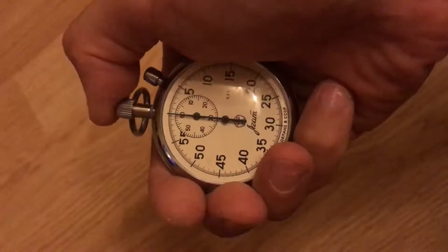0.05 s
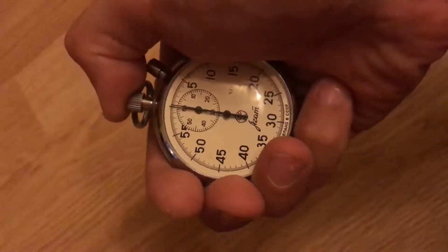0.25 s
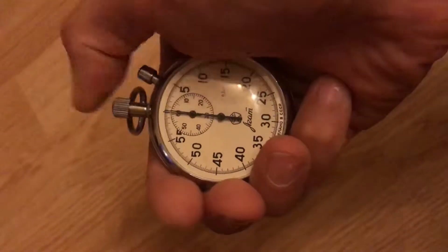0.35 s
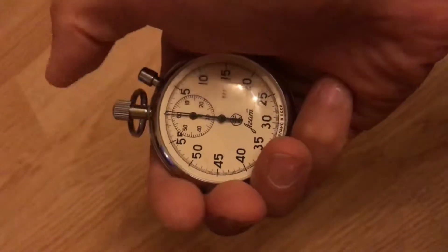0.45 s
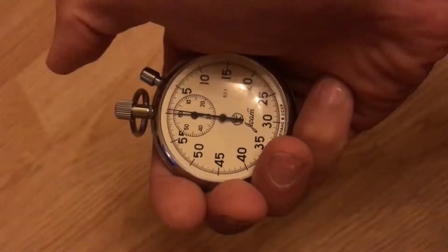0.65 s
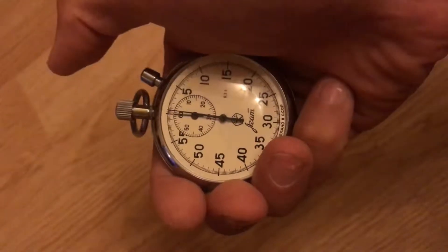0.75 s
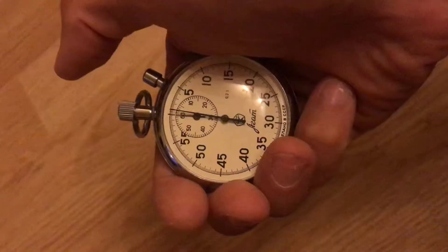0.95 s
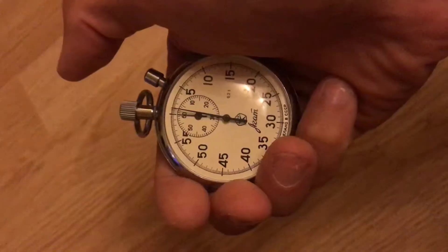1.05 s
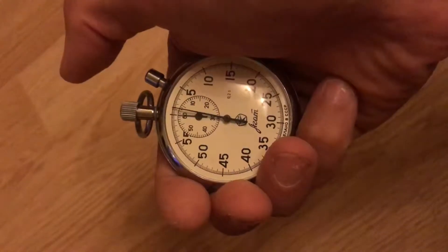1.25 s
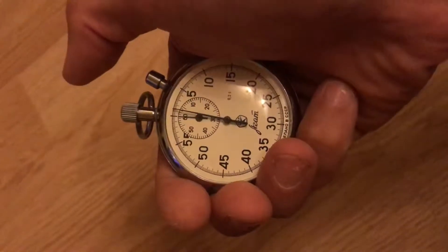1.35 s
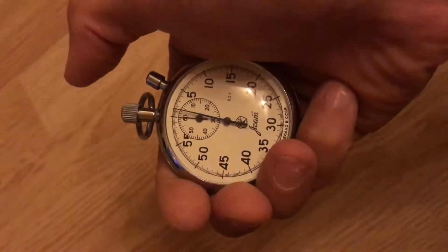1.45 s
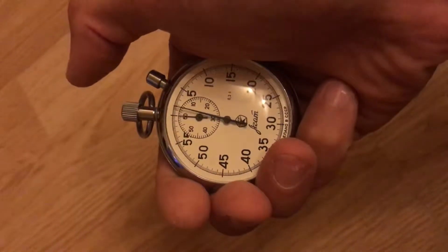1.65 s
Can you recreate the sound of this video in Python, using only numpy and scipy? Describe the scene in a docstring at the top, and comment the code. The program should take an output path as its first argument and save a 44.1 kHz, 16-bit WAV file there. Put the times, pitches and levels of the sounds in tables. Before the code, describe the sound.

A mechanical stopwatch is started close up in a small room. Tiny lever catches creak from about 0.15 seconds, and the crown snaps down with a sharp metallic click at 0.25. It springs back at 0.4 with a second click, a short rattle and a faint ring. From 0.5 to 1.5 seconds it ticks faintly, five times a second, over low hum, rumble and hiss.

```python
"""A mechanical stopwatch, started by a thumb and heard close up in a small room.
The levers creak and catch, the crown snaps down, then springs back with a short rattle.
Each contact rings the steel case and shakes the works; the two big clicks set a spring singing.
The escapement then ticks faintly five times a second over a bed of low hum, rumble and hiss."""
import sys
import numpy as np
from scipy import signal
from scipy.fft import rfft, irfft
from scipy.io import wavfile

SR = 44100
rng = np.random.default_rng(int(sys.argv[2]) if len(sys.argv) > 2 else 0)


def generate_wav(signal):
    """Clip the signal to [-1, 1] and save it as 16-bit WAV at the path in sys.argv[1]."""
    frames = np.transpose(np.atleast_2d(signal))
    scaled = np.clip(frames, -1, 1) * 32767
    pcm = np.round(scaled).astype(np.int16)
    wavfile.write(sys.argv[1], SR, pcm)


N = 74970
T = np.arange(N) / SR

# Levers catching as the crown travels. Each row: start in seconds, strength in dB, pawl ping in dB.
LEVER_CATCHES = [(0.135, -24.5, -75), (0.1533, -7.5, -45.5), (0.1564, 3, -32), (0.177, -4, -28),
                 (0.2034, -8, -54.5), (.2051, 0.5, -35), (0.2055, -3, -51.5), (.2275, -6.5, -53.5),
                 (.2330, 4, -35.5), (0.2495, 0, -27.5), (.3757, -12.5, -57), (.3834, 2, -37.5),
                 (0.3965, 1.5, -45), (0.3991, 5, -42)]
# The crown snaps home, then springs back and bounces. Each row: start in seconds, strength in dB.
CROWN_PRESS = [(.2349, 0), (.2354, 1)]
CROWN_RELEASE = [(0.4042, 2.5), (.4062, -0.5), (0.4124, -7.5)]
# Blunt knocks of the case, on press and on release.
# Each row: start in seconds, strength in dB, low and high band edges in Hz.
CASE_KNOCKS = [(.2354, 10.5, 90, 3623), (0.4129, -0.5, 1524, 2700)]
# Escapement beats, and tiny high pings between them. Each row: start in seconds, strength in dB.
BEATS = [(.516, -1), (0.7171, 1), (0.9155, -0.5), (1.1171, 0), (1.3158, -1), (1.5174, 2)]
HIGH_PINGS = [(1.023, -44.5), (1.229, -46), (1.330, -39), (1.4325, -44), (1.5347, -43.5), (1.637, -44.5)]
# Modes of the steel case. Each row: pitch in Hz, ring time (t60) in seconds,
# then gain in dB when struck by a press, a release, a catch and a tick.
CASE_MODES = [(2040, .03, -42, -33.5, -46, -68.5), (2193.4, 0.031, -27.5, -40.5, -53, -75.5),
              (2860, .035, -43, -39.5, -47.5, -61.5), (3610, .018, -23.5, -49.5, -51, -66),
              (4345, .018, -29, -38.5, -56, -93), (5158, 0.027, -34, -26.5, -43.5, -57),
              (5288, 0.028, -26.5, -31, -46, -61.5), (7080, 0.025, -28, -27, -57, -66),
              (8544, .022, -33, -28, -53.5, -62), (9000, .015, -30, -35, -46, -57),
              (10190, 0.02, -25, -27, -55.5, -64), (9960, .03, -24.5, -37.5, -54, -62),
              (12550, 0.02, -23.5, -42, -57, -95), (14050, .012, -25, -36.5, -56.5, -75.5),
              (15180, .018, -23, -38.5, -57, -61.5), (16140, 0.017, -19.5, -42.5, -58.5, -72.5)]
PRESS_MODE_DB, RELEASE_MODE_DB, CATCH_MODE_DB, TICK_MODE_DB = np.transpose(CASE_MODES)[2:]
# Partials of the spring. Each row: pitch in Hz, ring time (t60) in seconds, gain in dB.
SPRING_MODES = [(2198, 0.13, -53), (5110, .45, -54), (5240, .35, -51), (5345, .35, -49.5),
                (10240, .15, -54.5)]
# Tone of the works' dense, short clatter for each kind of hit. Each row: frequency in Hz, gain in dB.
CATCH_CLATTER_EQ = [(100, -44), (1400, -35), (2100, -15.5), (2800, -12.5), (4500, -20.5), (5300, -20),
                    (6800, -25), (9300, -18), (11000, -25.5), (16000, -26.5)]
PRESS_CLATTER_EQ = [(100, -7), (1200, -10.5), (2400, -3.5), (4200, 2), (6200, 1.5), (7800, -0.5),
                    (9300, 10), (11000, 0), (12300, 3.5), (16000, 3)]
RELEASE_CLATTER_EQ = [(100, -28.5), (900, -33), (1500, -8), (2500, 5), (3400, -3.5), (4300, 0), (5900, -2),
                      (7800, -7), (9300, 6), (11700, 1), (13500, -7), (16000, -8)]
TICK_CLATTER_EQ = [(100, -48), (1800, -46), (3000, -33), (4400, -58), (5300, -22), (6400, -45.5),
                   (9500, -28), (11000, -34.5), (16000, -38)]
# Tone of the room's tail, the rumble and the hiss. Each row: frequency in Hz, gain in dB.
ROOM_EQ = [(100, -40.5), (1000, -35), (1500, -26), (2000, -17), (3000, -20), (5200, -17), (7000, -18),
           (10000, -21), (11500, -18.5), (13500, -16), (15500, -22.5)]
RUMBLE_EQ = [(20, -68), (35, -55), (48, -43.5), (66, -44.5), (110, -39.5), (160, -47.5), (220, -44.5),
             (450, -57.5), (750, -56), (1020, -53.5), (1700, -62), (2300, -67.5), (4500, -79),
             (16000, -100)]
HISS_EQ = [(100, -57.5), (300, -60), (700, -67.5), (1500, -69), (3500, -70), (6000, -72), (8000, -75),
           (9300, -72.5), (10400, -79), (12000, -73), (15500, -76.5)]
# The hiss rides higher for a while after the snap. Each row: time in seconds, gain in dB.
HISS_FADER = [(0, 0), (.22, -1.5), (.25, 6), (.6, 10.5), (.805, 10), (.818, -1), (1.7, -1.5)]
# Mains hum, a low drone that swells, and the thud of the hand shifting as the thumb lifts.
# Each row: time in seconds, level in dB.
MAINS_FADER = [(0, -69), (.1, -60.5), (.58, -61), (.72, -80), (1.05, -57), (1.4, -57.5), (1.7, -64)]
DRONE_FADER = [(0, -67), (.68, -68.5), (.79, -59), (1.12, -58), (1.22, -63.5), (1.7, -69.5)]
THUD_FADER = [(.33, -95), (.368, -45), (0.389, -54), (.43, -62), (.52, -63.5), (.7, -80.5)]


def from_db(db):
    """Decibels to gain."""
    return 10 ** (np.asarray(db) / 20)


def fader(points):
    """A gain ride through (seconds, dB) points."""
    return from_db(np.interp(T, *np.transpose(points)))


def convolve(x, response):
    """Play x through an impulse response."""
    return signal.fftconvolve(x, response)[:N]


def equalise(x, points):
    """Minimum-phase EQ through (Hz, dB) points, so nothing rings ahead of a hit."""
    size = 4096
    hz, db = np.transpose(points)
    log_bin_hz = np.log(np.fft.rfftfreq(size, 1 / SR) + 1)
    gain = from_db(np.interp(log_bin_hz, np.log(hz), db))
    cepstrum = irfft(np.log(gain))
    cepstrum[1:size // 2] *= 2   # fold onto positive time
    cepstrum[size // 2 + 1:] = 0
    return convolve(x, irfft(np.exp(rfft(cepstrum))))


def band(x, low_hz, high_hz, order):
    """Butterworth band-pass."""
    sos = signal.butter(order, [low_hz, min(high_hz, .48 * SR)], "band", fs=SR, output="sos")
    return signal.sosfilt(sos, x + 1e-18)


def decay(t60):
    """An envelope that falls 60 dB in t60 seconds."""
    return np.exp(-np.log(1000) * T / t60)


def impulses(hits):
    """One impulse for each (seconds, dB) hit."""
    train = np.zeros(N)
    for start, db in hits:
        train[int(start * SR)] += from_db(db)
    return train


def hit_envelope(hits, t60):
    """Amplitude of a vibration that gains energy at each hit and dies away."""
    retained = np.exp(-2 * np.log(1000) / (t60 * SR))
    energy = signal.lfilter([1], [1, -retained], impulses(hits) ** 2 + 1e-24)
    return np.sqrt(energy)


def tone(hz):
    """A sine with a random starting phase."""
    return np.sin(2 * np.pi * (hz * T + rng.random()))


def ring(hits, hz, t60):
    """One mode, kept ringing by the hits."""
    return hit_envelope(hits, t60) * tone(hz)


def background():
    """The bed: room rumble, hiss, two low hums and the soft thud of the hand."""
    rumble = equalise(rng.standard_normal(N), RUMBLE_EQ)
    hiss = fader(HISS_FADER) * equalise(rng.standard_normal(N), HISS_EQ)
    mains = fader(MAINS_FADER) * tone(hz=49.5)
    drone = fader(DRONE_FADER) * tone(hz=88)
    hand_thud = fader(THUD_FADER) * tone(hz=124)
    return rumble + hiss + mains + drone + hand_thud


def strike_case(hits, mode_db, clatter_eq, clatter_t60):
    """Hits ring the case and shake the works; the small case radiates little bass."""
    ringing = sum(from_db(db) * ring(hits, hz, t60) for (hz, t60, *_), db in zip(CASE_MODES, mode_db))
    envelope = hit_envelope(hits, clatter_t60) / np.linalg.norm(decay(clatter_t60))
    clatter = equalise(envelope * rng.standard_normal(N), clatter_eq)
    return band(ringing, low_hz=1600, high_hz=SR, order=4) + clatter


def levers():
    """The levers creak in small catches, each with a short bright ping of the pawl."""
    catch_hits = [(start, db) for start, db, _ in LEVER_CATCHES]
    pawl_hits = [(start, db) for start, _, db in LEVER_CATCHES]
    catches = strike_case(catch_hits, CATCH_MODE_DB, CATCH_CLATTER_EQ, clatter_t60=.019)
    pawl = ring(pawl_hits, hz=9100, t60=.005)
    return catches + band(pawl, low_hz=5000, high_hz=15000, order=2)


def room(send, predelay_s=.013):
    """A short diffuse tail that starts with the nearest reflections."""
    tail = rng.standard_normal(N) * decay(t60=.29) * (T > predelay_s)
    return equalise(convolve(send, tail / np.linalg.norm(tail)), ROOM_EQ)


def case_knock(start, db, low_hz, high_hz):
    """A blunt contact that moves the whole case."""
    return band(impulses([(start, db)]), low_hz, high_hz, order=3)


def crown_snap(jolt_hz=62, jolt_gain_db=-42):
    """The crown goes home: a crack, a knock and a low jolt of the watch in the hand."""
    crack = strike_case(CROWN_PRESS, PRESS_MODE_DB, PRESS_CLATTER_EQ, clatter_t60=.018)
    hand_response = decay(t60=.11) * np.sin(2 * np.pi * jolt_hz * T)
    jolt = from_db(jolt_gain_db) * convolve(impulses(CROWN_PRESS[-1:]), hand_response)
    return crack + case_knock(*CASE_KNOCKS[0]) + jolt


def spring():
    """A coil sings on faintly after the snap and the rebound."""
    hits = [CROWN_PRESS[-1], CROWN_RELEASE[-1]]
    return sum(from_db(db) * ring(hits, hz, t60) for hz, t60, db in SPRING_MODES)


def crown_rebound():
    """The crown springs back, rattles and seats with a knock."""
    rattle = strike_case(CROWN_RELEASE, RELEASE_MODE_DB, RELEASE_CLATTER_EQ, clatter_t60=.011)
    return rattle + case_knock(*CASE_KNOCKS[1])


def escapement(unlock_lead_s=.0103, unlock_gain_db=-11):
    """On each beat the pallet softly unlocks, then a tooth drops; tiny pings glint in between."""
    unlocks = [(start - unlock_lead_s, db + unlock_gain_db) for start, db in BEATS]
    ticks = strike_case(list(BEATS) + unlocks, TICK_MODE_DB, TICK_CLATTER_EQ, clatter_t60=.014)
    pings = band(impulses(HIGH_PINGS), low_hz=12000, high_hz=15580, order=2)
    return ticks + pings


def scene():
    """The mono mix: the close watch, its room tail and the bed."""
    # Each layer is paired with its room send in dB.
    layers = [(levers(), .5), (crown_snap(), -1.5), (crown_rebound(), -.5), (escapement(), -2)]
    direct = sum(sound for sound, _ in layers) + spring()
    send = sum(from_db(db) * sound for sound, db in layers)
    return (direct + room(send) + background())[None]


def record(dry, cutoff_hz=15850):
    """A steep low-pass takes off the very top."""
    return signal.sosfilt(signal.ellip(10, .1, 80, cutoff_hz, fs=SR, output="sos"), dry)


dry = scene()
out = record(dry)
generate_wav(out)
```